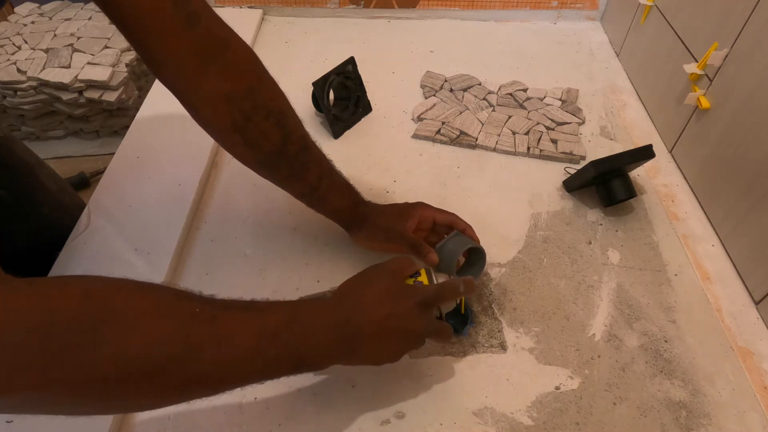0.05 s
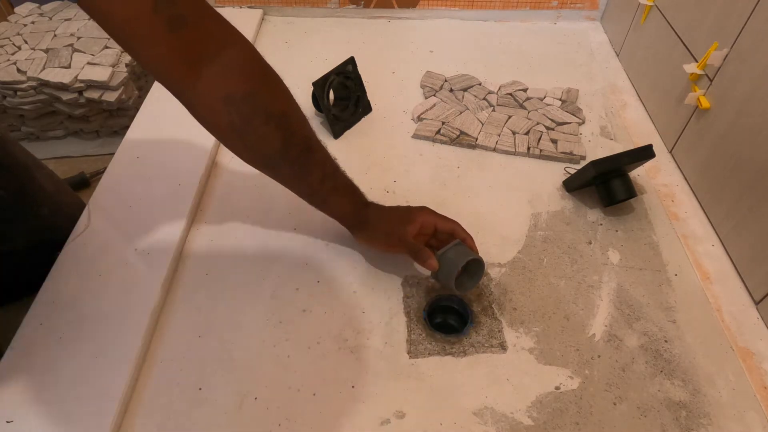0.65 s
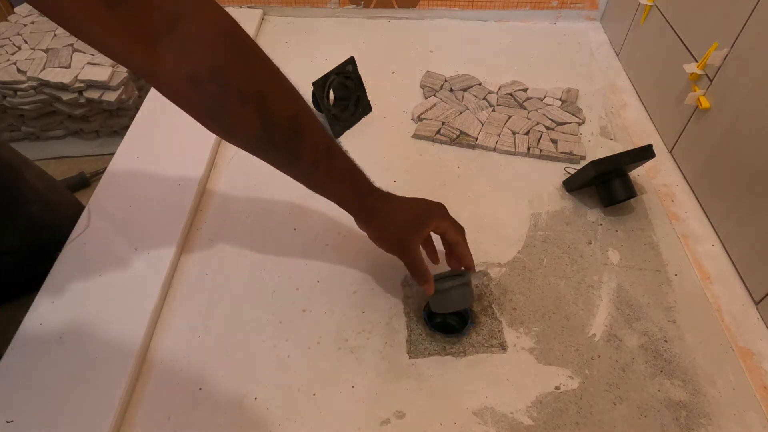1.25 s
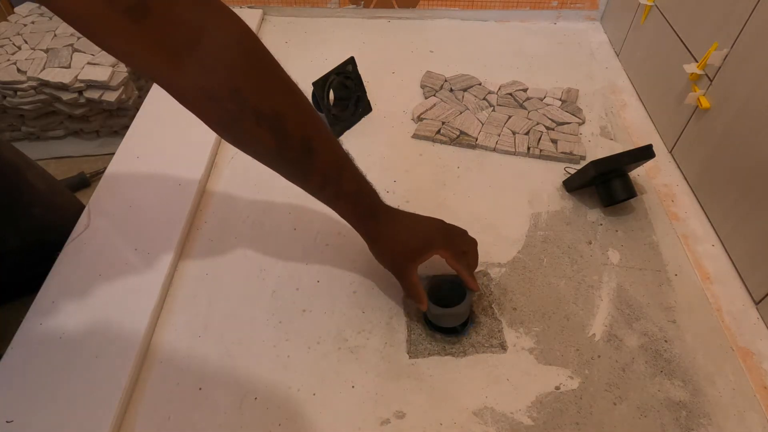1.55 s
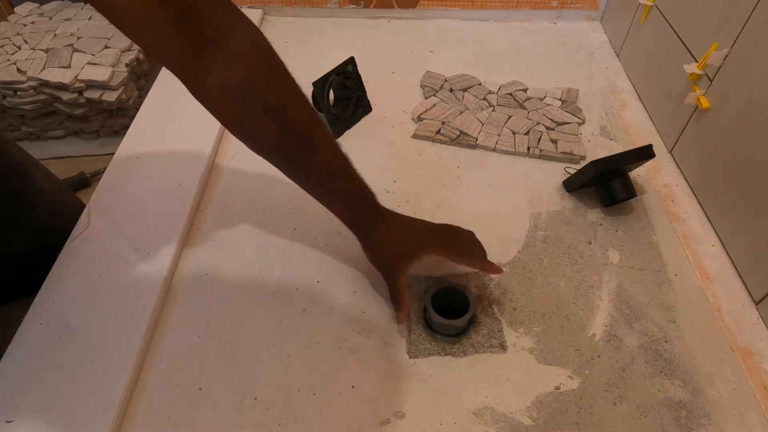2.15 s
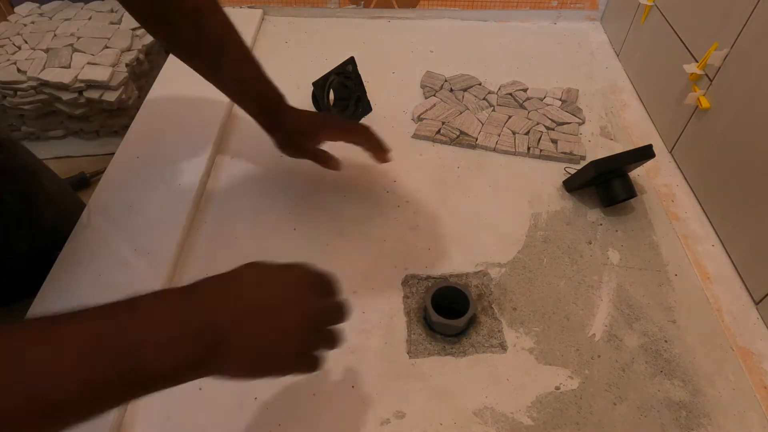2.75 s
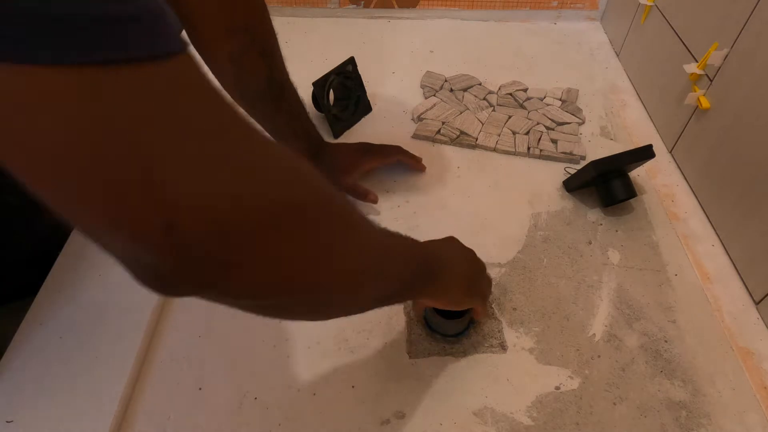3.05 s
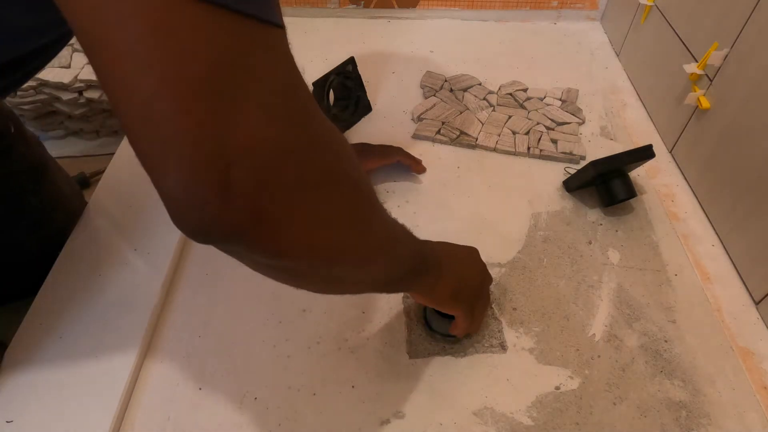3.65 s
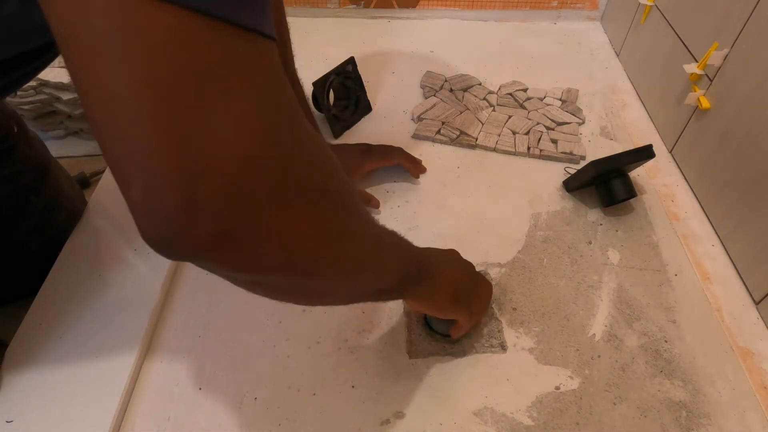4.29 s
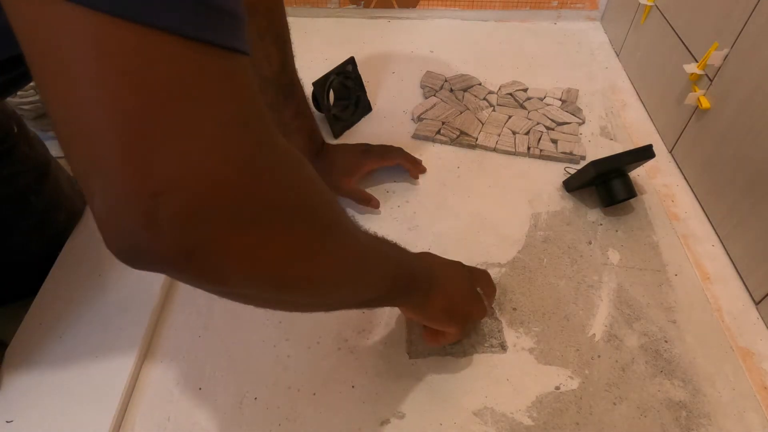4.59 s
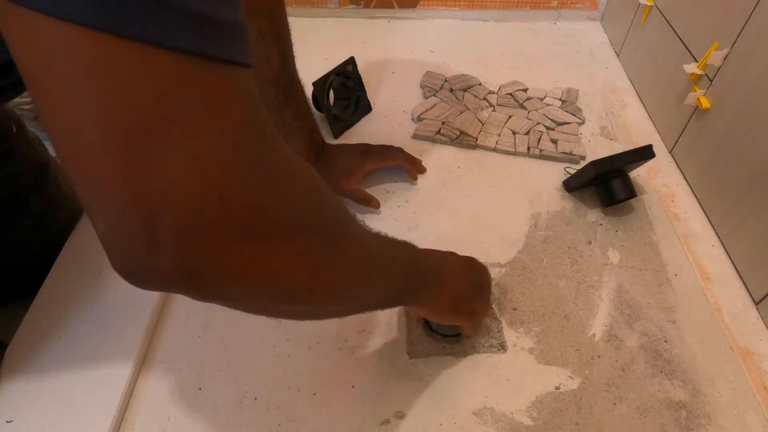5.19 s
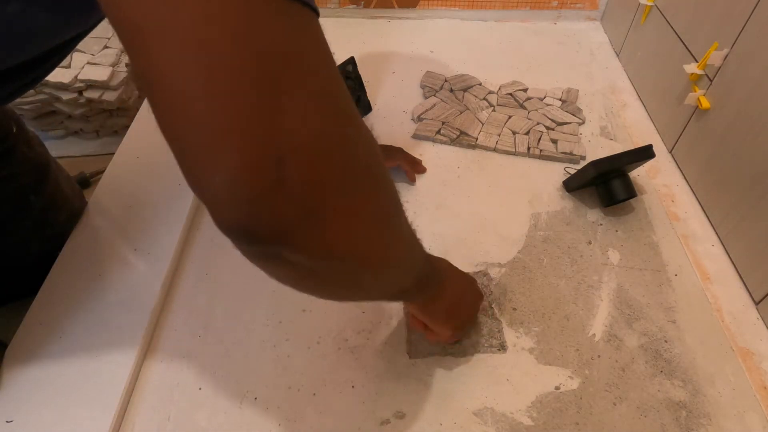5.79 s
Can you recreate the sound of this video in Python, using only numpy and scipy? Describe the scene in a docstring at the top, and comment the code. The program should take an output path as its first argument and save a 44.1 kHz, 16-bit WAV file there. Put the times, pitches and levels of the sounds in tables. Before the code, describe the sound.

After a quick spray, a plastic pipe fitting is seated with a hollow knock, followed by rubs, taps and gritty scrapes in a bathroom.

```python
"""A bare tiled bathroom, the camera's stereo microphone close to a plastic drain fitting in the floor.
A spray can hisses, blows a hollow note on the open drain and is slid aside, while room air and a low
rumble come up. At 1.3 s the fitting knocks into its socket and is pushed home with a groan.
From 2 s on, fingers rub it, tap it and scrape round it over gritty mortar."""
import sys
import numpy as np
from scipy import signal
from scipy.fft import rfft, irfft, next_fast_len
from scipy.io import wavfile
from scipy.ndimage import map_coordinates

SR = 44100
rng = np.random.default_rng(int(sys.argv[2]) if len(sys.argv) > 2 else 0)


def persist_wave(psi):
    """Save psi, clipped to +-1, as 16-bit WAV."""
    counts = np.round(np.clip(psi, -1, 1) * 32767).astype(np.int16)
    wavfile.write(sys.argv[1], SR, np.atleast_2d(counts).T)


N = 257103
T = np.arange(N) / SR


def amp(db):
    """Decibels to gain."""
    return 10 ** (np.asarray(db) / 20)


def unit(x):
    """x at rms 1."""
    return x / np.sqrt(np.mean(x ** 2) + 1e-20)


def along(points, hz):
    """(Hz, value) points read on a log axis."""
    freqs, values = np.transpose(points)
    return np.interp(np.log(hz + 1), np.log(freqs + 1), values)


def gain_at(points, t):
    """(s, dB) points read as a gain at the times t."""
    return amp(np.interp(t, *np.transpose(points)))


def above(hz, edge_hz):
    """A soft step from 0 to 1 at edge_hz."""
    return hz ** 4 / (hz ** 4 + edge_hz ** 4)


def bump(hz, centre_hz, width_hz, db):
    """A resonance, as dB over frequency."""
    return db / (1 + ((hz - centre_hz) / width_hz) ** 2)


def gate(t, length, edge):
    """On for length seconds, with soft edges."""
    return (1 - np.exp(-t / edge)) * np.exp(-np.maximum(t - length, 0) / edge)


def add(track, start, x):
    """Mix x into track from start seconds on."""
    part = track[..., max(round(start * SR), 0):][..., :x.shape[-1]]
    part += x[..., :part.shape[-1]]


def coloured(x, shape):
    """x through a causal filter whose gain in dB is shape(Hz)."""
    size = 4096
    cepstrum = irfft(np.log(amp(shape(np.fft.rfftfreq(size, 1 / SR))) + 1e-6))
    response = irfft(np.exp(rfft(2 * cepstrum[:size // 2], size) - cepstrum[0]))
    filtered = signal.oaconvolve(np.atleast_2d(x), response[None], axes=1)
    return filtered[:, :x.shape[-1]].reshape(x.shape)


def grains(t, rate, spread_db, smooth):
    """Tiny slips of random size, rate a second, on a share of smooth friction."""
    slips = (rng.random(len(t)) < rate / SR) * rng.choice([-1, 1], len(t))
    sizes = amp(spread_db * rng.standard_normal(len(t)))
    return unit(slips * sizes) + smooth * rng.standard_normal(len(t))


def spread(pair, side_db):
    """Two unrelated signals as middle and side of a left-right pair."""
    return pair[0] + amp(side_db) * np.array([pair[1], -pair[1]])


def stereo_noise(spectrum, side_db):
    """Noise of the given spectrum, spread round the microphone."""
    pair = coloured(rng.standard_normal((2, N)), lambda hz: along(spectrum, hz))
    return spread(unit(pair), side_db)


# The reverberation of the bathroom. Each row: frequency in Hz, t60 in seconds.
TILE_DECAY = [(120, 0.59), (600, 0.51), (2000, 0.43), (5000, 0.4), (9000, 0.43)]


def room(x, wet_db, left_db):
    """The direct sound at the microphone plus the tiled walls' answer, leaning left by left_db."""
    hz, t, bands = signal.stft(rng.standard_normal((2, SR // 2)), SR, nperseg=256)
    bands[1] *= amp(-5 * (1 - above(hz, 900)))[:, None]  # long waves reach both sides more alike
    decay = amp(-60 * t / along(TILE_DECAY, hz)[:, None])
    tail = signal.istft(bands * decay, SR, nperseg=256)[1]
    tail *= np.clip((T[:tail.shape[1]] - 0.004) / 0.0023, 0, 1)  # the nearest wall answers after 4 ms
    response = amp(wet_db) * spread(tail / np.linalg.norm(tail[0]), side_db=-2.5)
    response[:, 0] += 1  # the direct path
    balance = amp([[left_db / 2], [-left_db / 2]])
    return balance * signal.fftconvolve(x[None], response, axes=1) / np.hypot(1, amp(wet_db))


# The colour of the rumble. Each row: frequency in Hz, relative level in dB.
RUMBLE_SPECTRUM = [(20, -20), (50, -5), (85, -2), (115, -1), (170, -16.5), (400, -38), (1000, -83.5)]
# Its rise and fall. Each row: time in seconds, level in dB.
RUMBLE_SWELL = [(0, -76), (.8, -70), (1.6, -54), (3.0, -57), (3.15, -49.5), (5.83, -53)]


def rumble():
    """A low rumble comes up under everything, nearly alike on both sides of the microphone."""
    return gain_at(RUMBLE_SWELL, T) * stereo_noise(RUMBLE_SPECTRUM, side_db=-14)


def fade_in():
    """The gain of the steady background: it starts 20.5 dB down and is full after 1.97 s."""
    return amp(-20.5 * np.maximum(1 - T / 1.97, 0))


# A steady hum in the room. Each row: frequency in Hz, level in dB once faded in.
HUM_LINES = [(306.8, -68), (425.3, -71), (500.6, -69.5), (699.8, -69.5)]


def hum():
    """A few faint tones fade in with the air of the room."""
    return fade_in() * sum(amp(db) * np.sqrt(2) * np.sin(2 * np.pi * (hz * T + rng.random()))
                           for hz, db in HUM_LINES)


# The dull body and the hiss of air and rustle. Each row: frequency in Hz, relative level in dB.
BODY_SPECTRUM = [(88, -30), (150, -1.5), (493, -5), (539, -9), (684, -6), (737, -9.5), (1110, -9),
                 (3000, -21), (3900, -51.5), (6600, -120)]
HISS_SPECTRUM = [(1500, -2.5), (2300, -4.5), (3000, -5), (5700, -9), (7300, -25.5), (10000, -45.5),
                 (12000, -72.5)]
# Soft swells of rustle; the first is the faint wash that lingers after the opening scrape.
# Each row: start in seconds, length in seconds, hiss level in dB.
RUSTLE_SWELLS = [(.55, 0.23, -69), (1.014, 0.77, -62), (2.55, 0.29, -68.5), (3.012, 0.35, -56.5),
                 (3.42, 2.9, -62), (4.51, 0.68, -54.5)]
AIR_BODY_DB, AIR_HISS_DB = -58.5, -69


def air_and_rustle():
    """The room's air fades in; a soft rustle with a dull body swells over it now and then."""
    rustle = np.sqrt(sum((amp(db) * gate(np.maximum(T - start, 0), length, edge=0.081)) ** 2
                         for start, length, db in RUSTLE_SWELLS))
    body_gain = np.hypot(amp(AIR_BODY_DB) * fade_in(), amp(2.5) * rustle)
    hiss_gain = np.hypot(amp(AIR_HISS_DB) * fade_in(), rustle)
    body = body_gain * stereo_noise(BODY_SPECTRUM, side_db=-13.5)
    hiss = hiss_gain * stereo_noise(HISS_SPECTRUM, side_db=-10.5)
    return body + hiss


# Thuds through the floor. Each row: start in seconds, level in dB, pitch in Hz, t60 in seconds.
FLOOR_THUDS = [(1.055, -48.5, 123, 0.17), (1.31, -19, 139, 0.17), (1.559, -38.5, 75.3, 0.94),
               (2.536, -31, 128.5, 0.31), (5.059, -40.5, 79.1, 0.82)]


def floor_thuds():
    """Soft, heavy contacts boom through the floor, dead centre at the microphone."""
    out, t = np.zeros(N), T[:SR]
    onset = 1 - np.exp(-t / 0.013)
    for start, db, hz, t60 in FLOOR_THUDS:
        add(out, start, onset * amp(db - 60 * t / t60) * np.sin(2 * np.pi * hz * t))
    return out


# The jet of the can. Each row: frequency in Hz, relative level in dB.
JET_SPECTRUM = [(60, -9), (120, 4.5), (200, -5.5), (500, -0.5), (1300, -0.5), (2200, -4.5), (6200, -6),
                (7500, -18), (10000, -41.5)]
# The drain's air column, blown by the jet. Each row: frequency in Hz, level in dB.
HOOT_MODES = [(473, -38), (626, -47.5), (1203, -49.5)]
HOOT_START_S, HOOT_HOLD_S, HOOT_RISE_S, HOOT_T60_S = 0.05, 0.076, 0.014, 0.23


def spray():
    """Close by, the jet hisses from its straw and briefly blows a hollow note on the open drain."""
    out, t = np.zeros((2, N)), T[:SR // 2]
    jet = unit(coloured(rng.standard_normal(len(t)), lambda hz: along(JET_SPECTRUM, hz)))
    squirt = amp(-39) * gate(t, length=0.12, edge=0.002) * jet
    add(out, 0, room(squirt, wet_db=-4.5, left_db=1))
    swell = (1 - np.exp(-t / HOOT_RISE_S)) * amp(-60 * np.maximum(t - HOOT_HOLD_S, 0) / HOOT_T60_S)
    for hz, db in HOOT_MODES:
        flutter = unit(coloured(rng.standard_normal(len(t)), lambda f: -60 * above(f, 60)))
        note = np.sqrt(2) * np.sin(2 * np.pi * hz * t + 0.6 * flutter)
        add(out, HOOT_START_S, amp(db) * swell * note)
    return out


# Friction on sandy mortar. Each row: frequency in Hz, relative level in dB.
MORTAR_SPECTRUM = [(100, -3), (350, -2.5), (1300, 0), (2400, -4.5), (4500, -7.5), (6800, -14), (8000, -30),
                   (10000, -44)]
# The rim's resonances under the fingers. Each row: centre in Hz, full width in Hz, relative lift in dB.
RIM_MODES = [(1490, 580, 2.5), (3610, 800, 5.5), (5750, 700, 6)]
# Gritty scrapes; the row at 1.321 s is the hissy tail of the knock. Each row: start, rise and drag
# length in seconds, bite level in dB, treble grit in dB, weight of the rim's ring in the bite.
GRITTY_SCRAPES = [(0.418, 0.0024, 0.15, -35.5, 17.5, .7), (0.89, 0.0033, .09, -59.5, 0, 0.43),
                  (1.321, 0.05, 0.3, -45.5, -0.5, .1), (2.584, 0.03, 0.02, -42, 7, 0.21),
                  (3.468, 0.015, 0.0069, -36.5, -1.5, 0.17), (3.726, 0.012, 0.023, -44, 6, 0.23),
                  (4.419, 0.087, 0.11, -33.5, 4.5, 1.23), (4.744, .035, 0.21, -26.5, 10.5, 1.08),
                  (5.025, 0.027, 0.034, -29, 0, 1.05), (5.375, 0.024, 0.15, -35, 5, 0.96),
                  (5.757, 0.05, 0.16, -38.5, -4, 0.67)]
BITE_FADE_S = 0.067  # per 20 dB
DRAG_MAX_DB, DRAG_UNEVEN_DB, DRAG_UNEVEN_HZ, DRAG_EDGE_S = -43, 0.5, 25, 0.025


def sand(t, grit_db, ring):
    """Sand grains catch on the plastic and excite the rim's resonances."""
    rim = lambda hz: sum(bump(hz, centre, width / 2, db) for centre, width, db in RIM_MODES)
    colour = lambda hz: along(MORTAR_SPECTRUM, hz) + grit_db * above(hz, 2500) + ring * rim(hz)
    return unit(coloured(grains(t, rate=3000, spread_db=3, smooth=0.95), colour))


def scraping():
    """Close scrapes and the knock's hissy tail: each bites, drags on nearly evenly and dies away."""
    out, t = np.zeros((2, N)), T[:SR // 2]
    for start, rise, length, db, grit_db, ring in GRITTY_SCRAPES:
        bite = amp(db - 20 * np.maximum(t - rise, 0) / BITE_FADE_S) * sand(t, grit_db, ring)
        uneven = map_coordinates(rng.standard_normal(64), [t * DRAG_UNEVEN_HZ], mode="mirror")
        drag_gain = amp(min(DRAG_MAX_DB, db) + DRAG_UNEVEN_DB * uneven) * gate(t, length, DRAG_EDGE_S)
        drag = drag_gain * sand(t, grit_db=0.5, ring=1.14)
        onset = np.minimum(t / rise, 1) ** 2
        add(out, start, room(onset * (bite + drag), wet_db=-7, left_db=0.7))
    return out


# The fitting's plastic, tapped or rubbed. Each row: frequency in Hz, relative level in dB.
PLASTIC_SPECTRUM = [(60, -33), (140, -3.5), (350, -9.5), (600, -6.5), (1100, -2.5), (2300, -16.5),
                    (4700, -22.5), (7000, -37.5), (10000, -65.5)]
# Contacts on the plastic. Each row: start in seconds, drive level in dB, bass thud in dB,
# t60 of the chatter in seconds.
PLASTIC_TAPS = [(1.303, 28, -0.5, 0.019), (1.314, 22.5, 8.5, 0.028), (1.495, 13.5, 1, 0.015),
                (2.5328, 23, -4.5, .012), (2.623, 2, -1, 0.0064), (3.479, -8, 6.5, 0.0067),
                (4.741, 18.5, -4, 0.042), (5.038, 9, -5, 0.0079), (5.515, 14.5, -12, .026),
                (5.775, 5, -21, 0.0094)]
SNAP_DB, SNAP_T60_S, SNAP_LOSS_DB = 3.5, 0.011, 7.5  # treble lift at this t60; loss per doubling of t60


def taps():
    """Each close contact is a push and a short chatter; brief ones snap, long ones crunch."""
    out, t = np.zeros((2, N)), T[:SR // 10]
    for start, db, thud_db, t60 in PLASTIC_TAPS:
        chatter = rng.standard_normal(len(t)) * amp(-60 * t / t60) * (1 - np.exp(-6 * t / t60))
        push = 0.0067 / t60 * (t == 0)
        force = chatter / np.linalg.norm(chatter) + push
        force = irfft(np.exp(1j * np.angle(rfft(force))))  # a blow drives all pitches alike
        force *= amp(-20 * t / t60)
        snap_db = SNAP_DB - SNAP_LOSS_DB * np.log2(t60 / SNAP_T60_S)
        body = lambda hz: (along(PLASTIC_SPECTRUM, hz) + thud_db * (1 - above(hz, 910))
                           + snap_db * above(hz, 2800))
        tap = amp(db) * coloured(force / np.linalg.norm(force), body)
        add(out, start, room(tap, wet_db=-0.5, left_db=2.5))
    return out


# Skin sliding on the fitting. Each row: start and length in seconds, level in dB, resonance in Hz,
# its lift in dB, energy of the pop in dB.
SKIN_RUBS = [(2.003, 0.0815, -46, 1904, 17, -7), (2.435, 0.13, -44, 1250, -1.5, -20.5)]
POP_LEAD_S = 0.007


def rubbing():
    """Just left of centre, skin breaks loose with a dull pop and stutters along the plastic."""
    out, t = np.zeros((2, N)), T[:SR // 4]
    dull = lambda hz: along(PLASTIC_SPECTRUM, hz) - 9 * above(hz, 2900) - 6 * (1 - above(hz, 1000))
    pop = coloured(1.0 * (t == 0), lambda hz: dull(hz) + bump(hz, centre_hz=1560, width_hz=240, db=14.5))
    pop /= np.linalg.norm(pop)
    for start, length, db, centre_hz, ring_db, pop_db in SKIN_RUBS:
        hollow = lambda hz: (bump(hz, centre_hz, 150, ring_db)
                             + bump(hz, 1.54 * centre_hz, 220, 0.84 * ring_db))
        slips = grains(t, rate=1600, spread_db=1.5, smooth=1)
        skin = unit(coloured(slips, lambda hz: dull(hz) + hollow(hz)))
        add(out, start - POP_LEAD_S, room(amp(pop_db) * pop, wet_db=1, left_db=1))
        add(out, start, room(amp(db) * skin * gate(t, length, edge=0.0019), wet_db=-4.5, left_db=3))
    return out


# Tones of the hollow ring after the knock. Each row: frequency in Hz, relative level in dB,
# t60 in seconds before the cap at max_t60.
RING_TONES = [(142.7, -19, 0.57), (235.3, -1, 0.29), (589, 1.5, 0.69), (635, -9, 0.99), (680, -15.5, 0.56),
              (774, -2, 0.84), (933, -2.5, 0.18), (930, -19, 0.81), (1030, -12.5, 1.2), (1070, -17.5, 0.17),
              (1250, -37.5, 5.0), (1370, -16.5, 0.14), (1590, -30.5, 2.3), (1784, -25, 0.49),
              (1786, -8.5, 0.14), (1860, -12.5, 0.3)]


def hollow_ring(max_t60):
    """One hollow ring of decaying tones, their decay times capped at max_t60; energy 1."""
    t = T[:SR // 2]
    ring = np.zeros(len(t))
    for hz, db, t60 in RING_TONES:
        decay = amp(db + rng.normal(0, 1) - 60 * t / min(t60, max_t60))
        ring += decay * np.sin(2 * np.pi * (hz * t + rng.random()))
    ring *= 1 - np.exp(-t / 0.002)
    return ring / np.linalg.norm(ring)


# The rasp of the socket. Each row: frequency in Hz, relative level in dB.
SOCKET_SPECTRUM = [(29, -36), (50, -24), (107, -15), (139, 5), (173, -4), (210, -1), (338, -11), (377, -5),
                   (449, -6.5), (570, 1.5), (708, -15), (939, -3), (1170, -24), (4490, -31), (9000, -63.5),
                   (11700, -81), (19800, -120)]
# The push that seats the fitting. Each row: time in seconds, level in dB.
PUSH_SWELL = [(1.47, -46), (1.495, -32), (1.54, -25.5), (1.575, -30), (1.62, -39.5), (1.68, -67)]


def seating():
    """Close and a little left, the first knock rings hollow; the fitting judders down its socket."""
    out, t = np.zeros((2, N)), T[:SR // 4]
    knock_start, push_start = PLASTIC_TAPS[0][0], PUSH_SWELL[0][0]
    add(out, knock_start, room(amp(14.5) * hollow_ring(max_t60=0.47), wet_db=-7, left_db=3))
    slips = grains(t, rate=320, spread_db=0.5, smooth=0.82)
    groan = unit(signal.fftconvolve(slips, hollow_ring(max_t60=0.28))[:len(t)])
    rasp = unit(coloured(slips, lambda hz: along(SOCKET_SPECTRUM, hz)))
    judder = gain_at(PUSH_SWELL, push_start + t) * (rasp + amp(-9) * groan)
    add(out, push_start, room(judder, wet_db=-12.5, left_db=2.5))
    return out


def scene():
    """The close work at the drain over the background of the bathroom, left and right."""
    close_work = spray() + seating() + taps() + scraping() + rubbing()
    return close_work + floor_thuds() + rumble() + air_and_rustle() + hum()


def record(dry):
    """The camera keeps nothing above its band limit; its converter sits slightly off zero."""
    top_hz, dc_offset = 9900, 0.0014
    size = next_fast_len(N + SR // 2)
    passband = np.fft.rfftfreq(size, 1 / SR) < top_hz
    return irfft(rfft(dry, size) * passband, size)[:, :N] + dc_offset


dry = scene()
out = record(dry)
persist_wave(out)
```